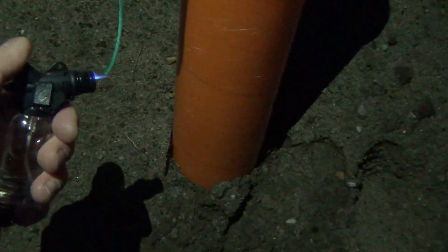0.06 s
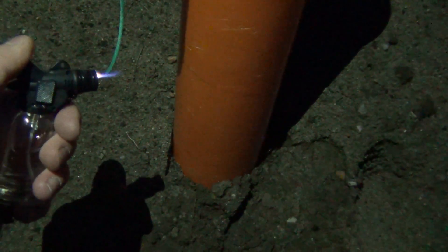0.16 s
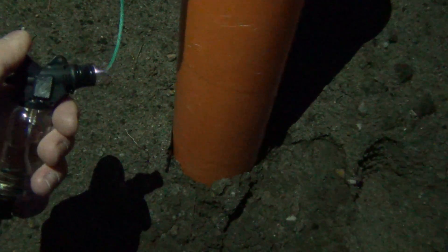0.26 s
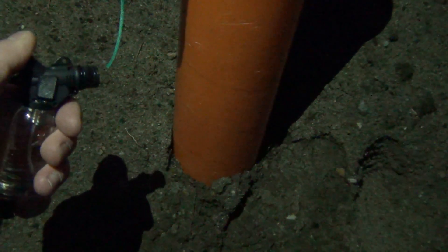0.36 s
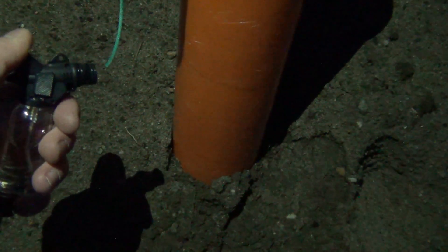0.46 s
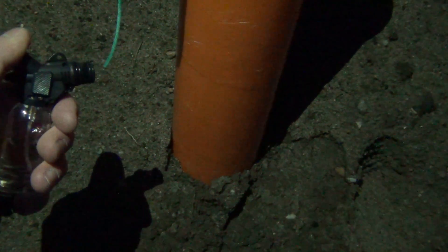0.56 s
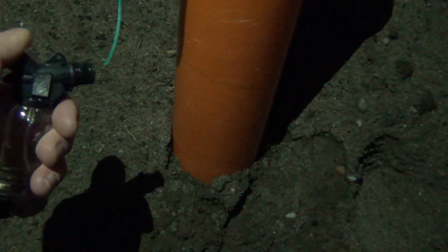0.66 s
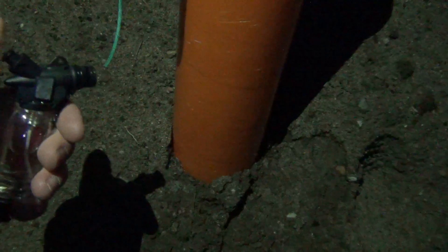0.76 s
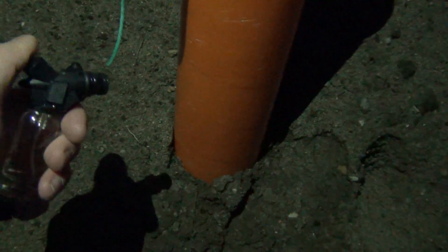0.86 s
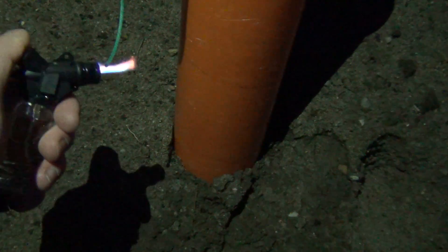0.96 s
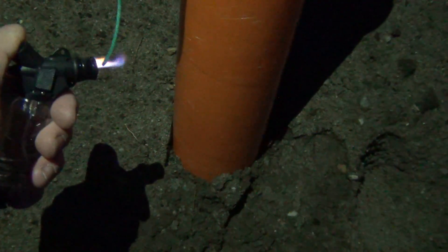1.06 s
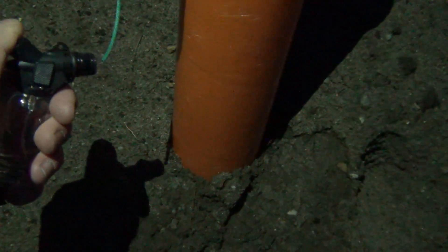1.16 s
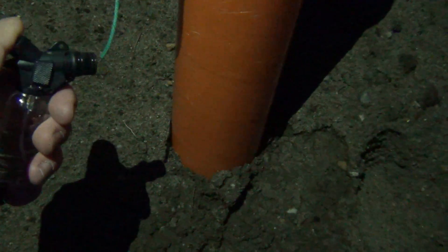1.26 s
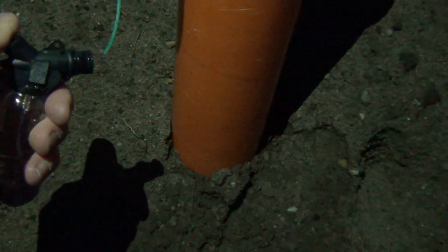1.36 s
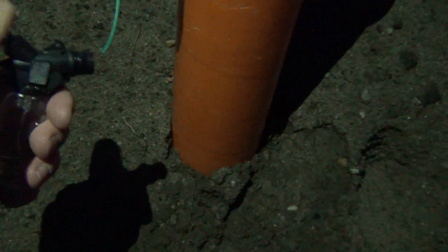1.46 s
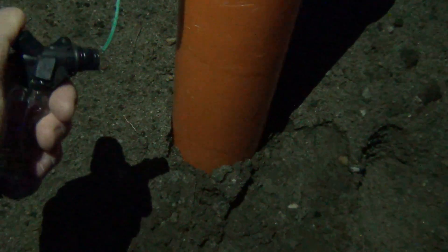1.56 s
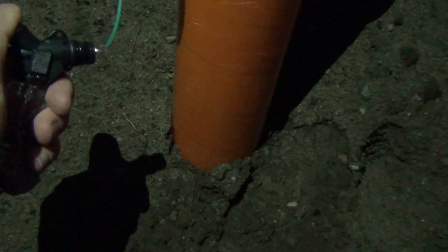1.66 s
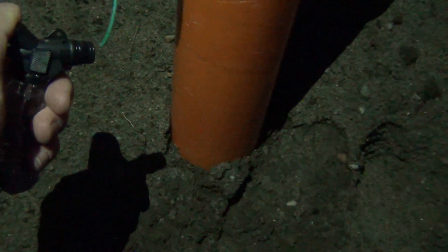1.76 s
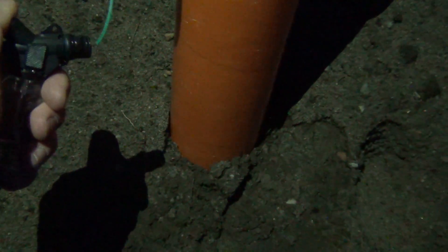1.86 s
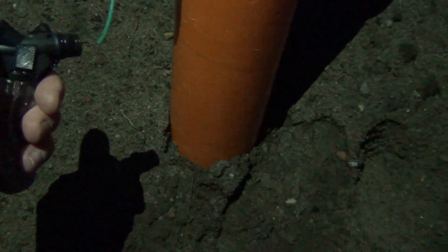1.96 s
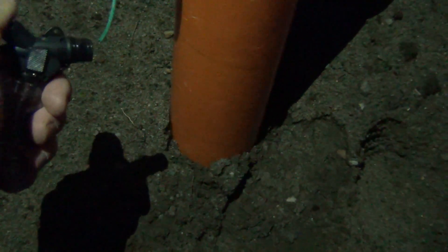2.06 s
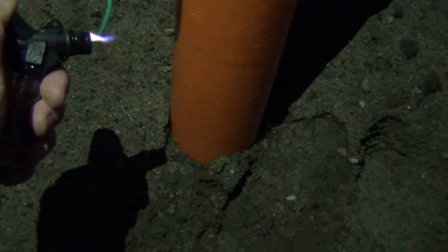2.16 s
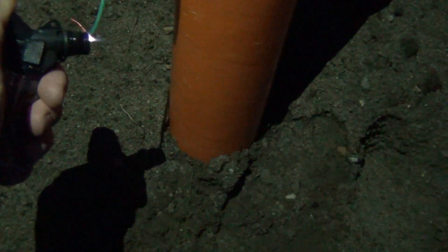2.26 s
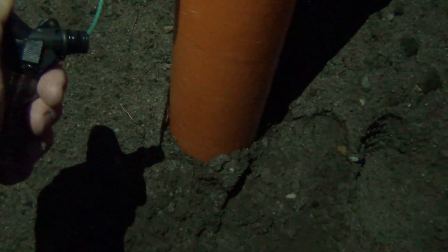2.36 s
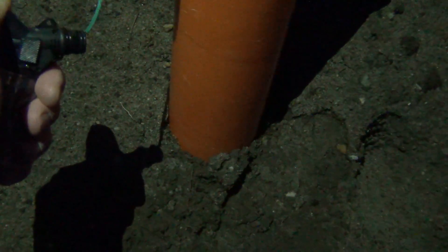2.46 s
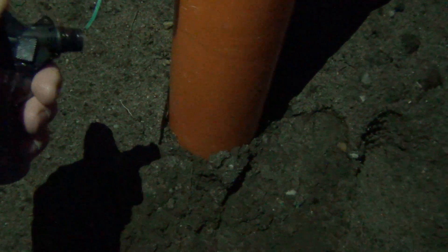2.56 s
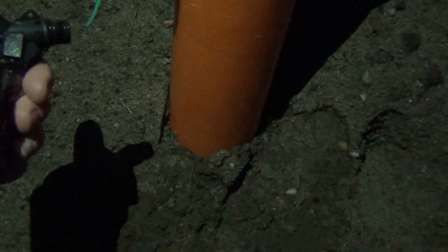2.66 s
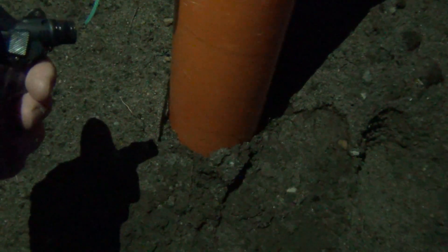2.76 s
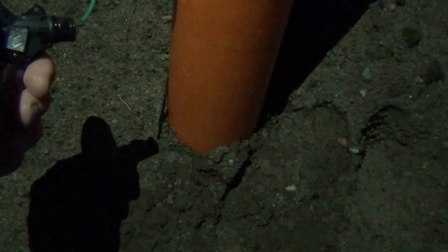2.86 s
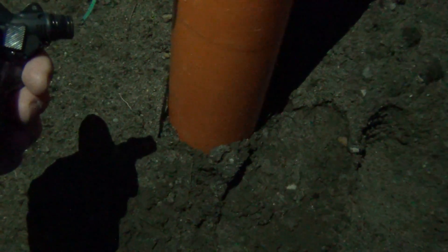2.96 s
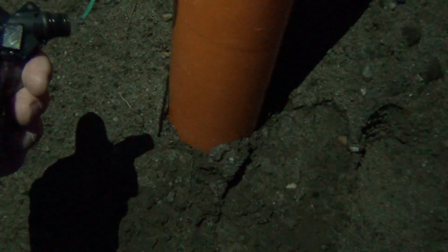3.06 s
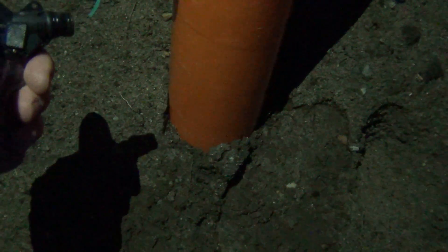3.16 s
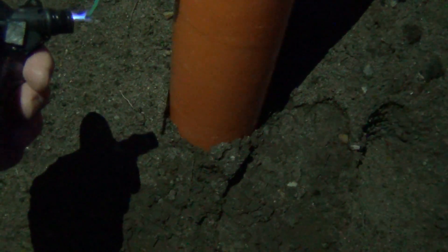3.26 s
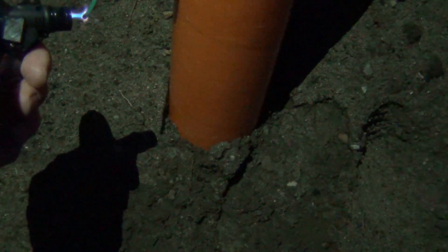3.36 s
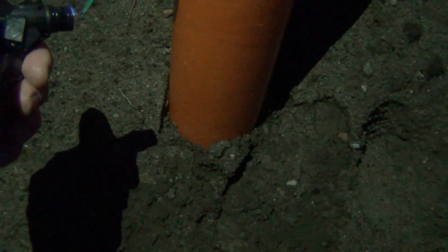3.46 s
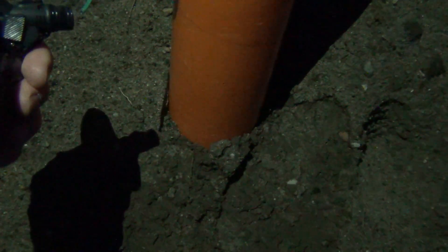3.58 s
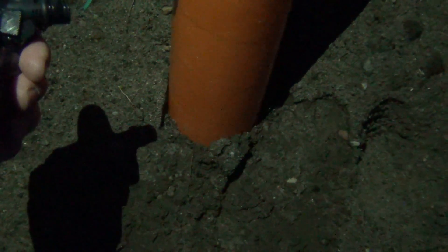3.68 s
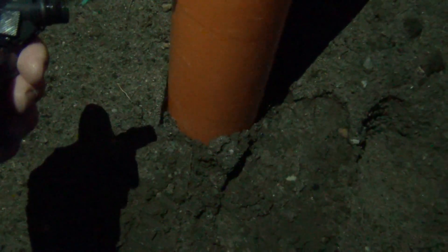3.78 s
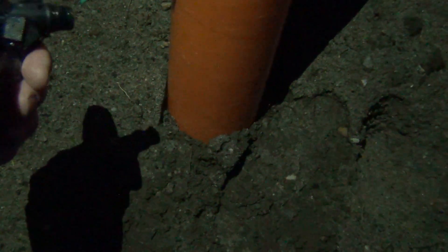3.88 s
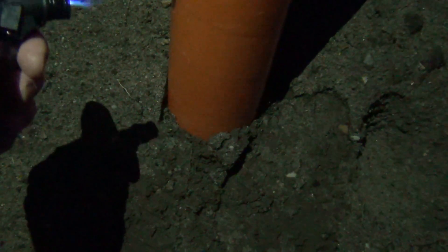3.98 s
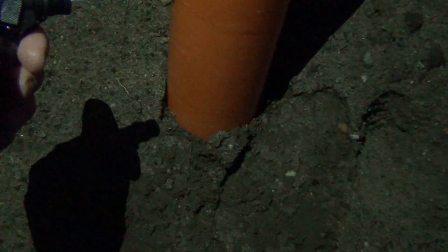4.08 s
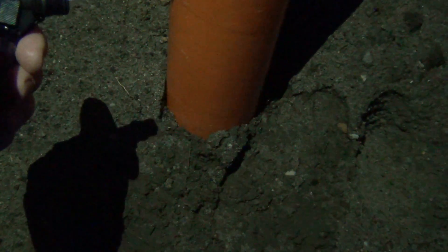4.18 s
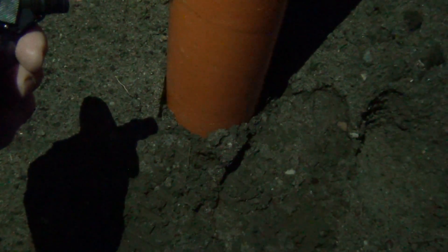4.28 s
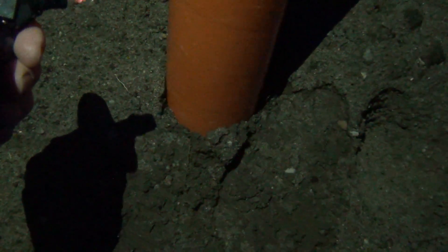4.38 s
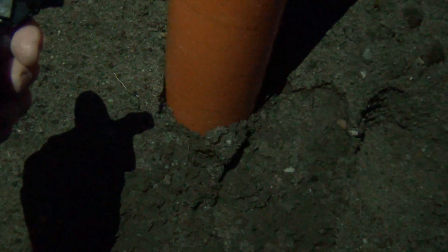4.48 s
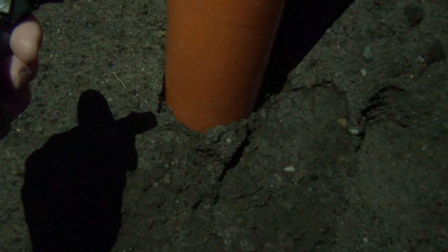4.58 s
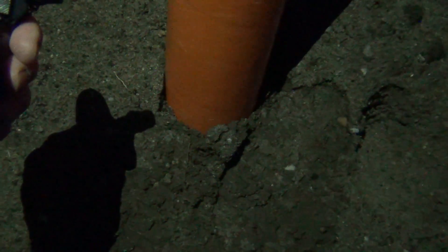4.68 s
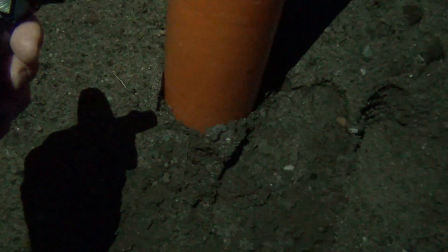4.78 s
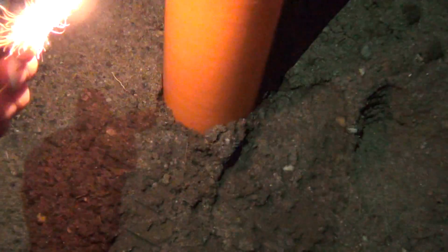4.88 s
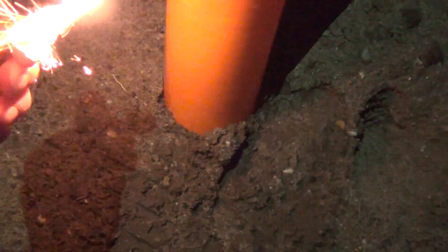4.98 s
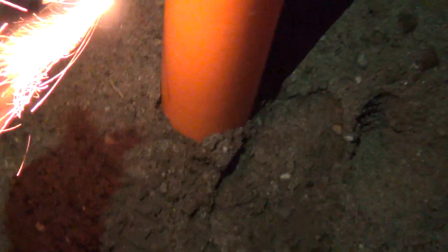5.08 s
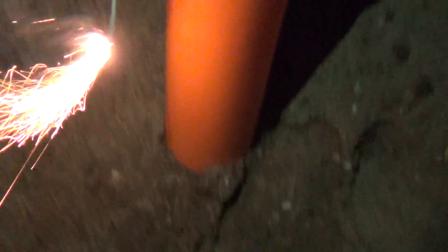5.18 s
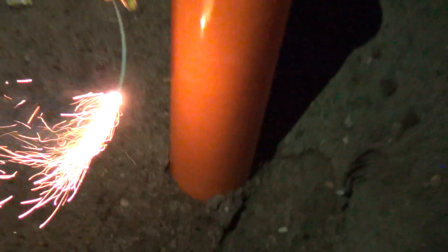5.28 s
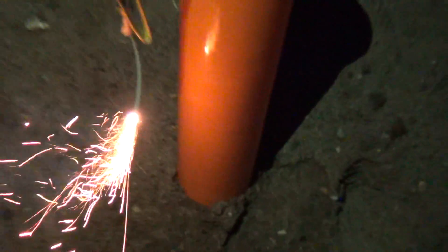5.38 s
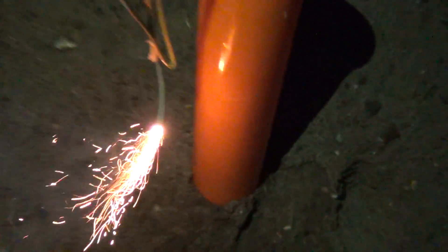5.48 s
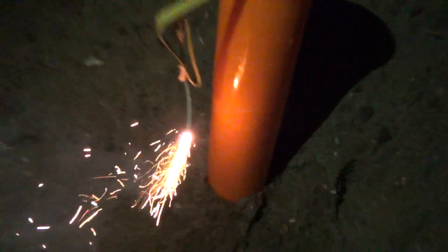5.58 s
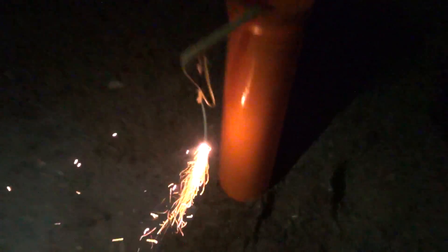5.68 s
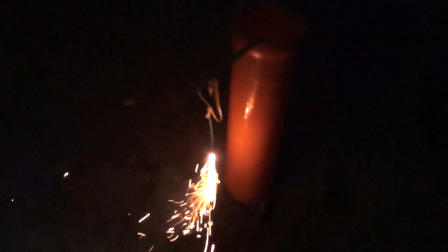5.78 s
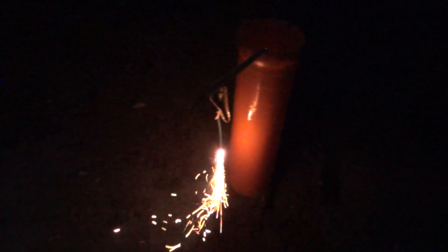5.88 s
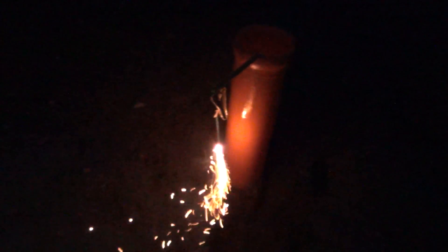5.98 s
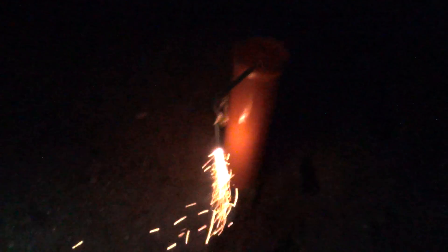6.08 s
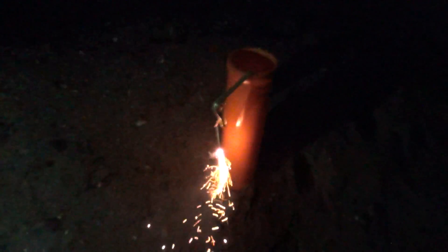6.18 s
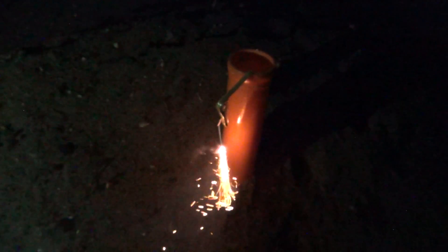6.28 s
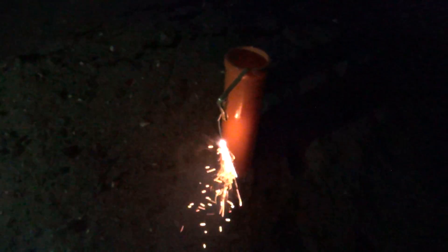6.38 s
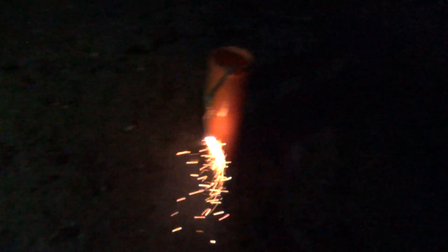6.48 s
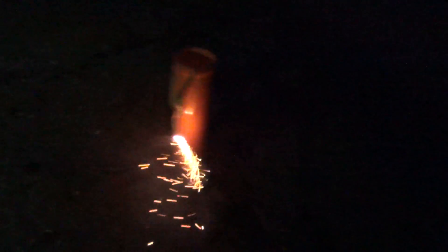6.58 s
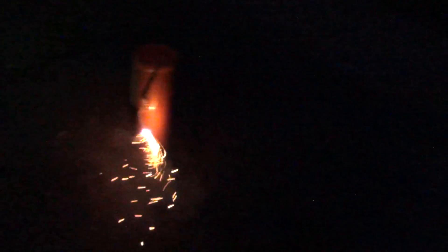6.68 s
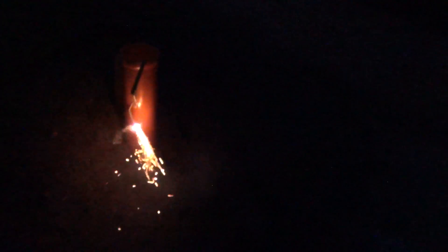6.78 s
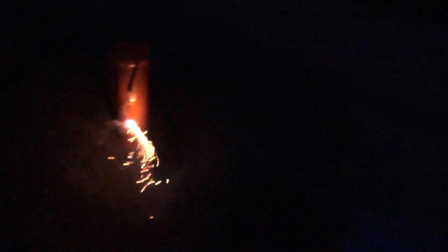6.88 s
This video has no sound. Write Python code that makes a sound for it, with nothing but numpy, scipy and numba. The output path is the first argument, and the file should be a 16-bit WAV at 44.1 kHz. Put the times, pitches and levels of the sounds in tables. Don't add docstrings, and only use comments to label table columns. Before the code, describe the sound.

Sharp plastic igniter snaps and brief sputtering flame bursts over faint gas hiss, then a burning fuse jets out broadly as footsteps crunch back.

```python
import sys
import numpy as np
from scipy import signal
from scipy.fft import rfft, irfft, next_fast_len
from scipy.io import wavfile
from scipy.ndimage import uniform_filter1d, minimum_filter1d, map_coordinates
from numba import njit

SR = 44100
rng = np.random.default_rng(int(sys.argv[2]) if len(sys.argv) > 2 else 0)


def int16_out(signal):
    q = np.round(np.clip(np.atleast_2d(signal).T, -1, 1) * 32767)
    wavfile.write(sys.argv[1], SR, q.astype(np.int16))


def decibels_to_gain(level_db):
    exponent = np.asarray(level_db, float) / 20
    return 10 ** exponent


N = 306054
TIME = np.arange(N) / SR

# (time [s], level [dB])
WIND = [(0, -38), (.25, -36.5), (.7, -39), (.79, -42), (.86, -36), (.92, -43), (1.0, -43.5), (1.08, -39.5),
        (1.2, -45.5), (1.7, -44), (2.55, -47), (2.6, -50.5), (3.4, -54), (3.7, -58.5), (4.9, -56.5),
        (5.06, -53.5), (5.3, -52), (6.1, -39.5), (6.94, -37)]
# (start [s], hold [s], level [dB], rise [dB/ms], fall [dB/ms])
GUSTS = [
    (-.1, .86, -42, 1.5, .06),
    (5.55, 2.5, -44.5, .026, .1),
    (.58, .06, -35, .5, .3),
    (2.9, 1.0, -71, .05, .03),
]
# (frequency [Hz], level [dB per Hz])
BUFFET = [(12, -61), (20, -26), (76, -3), (123, -1), (201, -2), (277, -5.5), (440, -10), (585, -6.5),
          (900, -12), (1170, -34), (1980, -120)]
# (frequency [Hz], level [dB per Hz])
NIGHT = [(88, -45), (150, -27), (400, -18.5), (569, -12), (652, -10.5), (718, -8), (958, -11.5),
         (1280, -10), (1640, -13), (4000, -35.5), (5200, -65), (8800, -120)]
# (frequency [Hz], level [dB per Hz])
NOZZLE = [(2500, -7.5), (3300, -17.5), (4100, -19), (4900, -7.5), (5800, -17), (6500, -4), (6950, -5.5),
          (7400, -0.5), (8400, -11), (10000, -8), (11400, -13.5), (12400, -15), (13600, -17.5),
          (15500, -21.5)]
# (start [s], hold [s])
ALIGHT = [
    (3.29, .31),
    (4.03, .66),
]
# (low edge [Hz], high edge [Hz], change [dB])
ALIGHT_BANDS = [(9000, 11300, -4.5), (11400, 12300, 5), (13100, 14400, 6), (14700, 16000, -4)]
# (time [s], peak [dB], thud [Hz], length [s])
STEPS = [(6.451, -31, 1160, 0.008), (6.604, -23, 222, 0.01), (6.725, -27, 1900, .012),
         (6.77, -15.5, 353, 0.0045), (6.831, -29, 1090, 0.0059), (6.888, -22, 470, 0.012),
         (6.906, -21.5, 910, 0.013), (6.923, -26, 439, 0.01)]
# (time [s], peak [dB], body mode [Hz], middle [dB], treble [dB])
COCKS = [(0.7384, -10.5, 3060, -1, 2), (1.4639, -7.5, 3090, 0, -4), (1.9994, -9, 3050, -1, -3.5),
         (2.6878, -10, 3150, -1.5, -7.5), (3.1176, -5, 2620, 1.5, -2.5), (3.8548, -4.5, 3030, 3.5, -3)]
# (time [s], peak [dB], body mode [Hz], middle [dB], treble [dB])
SNAPS = [(0.9756, 2.5, 3320, 4, 3.5), (1.6203, 1.5, 3190, 3.5, 0.5), (2.1662, 0.2, 3120, 1.2, 0),
         (2.847, 7, 3156, -1.5, -3.5), (3.2745, 3.5, 3130, 1, 0), (4.0082, 2.5, 3095, 2, 0.5)]
# (time [s], peak [dB], body mode [Hz], middle [dB], treble [dB])
TICKS = [(0.6774, -27, 2430, 0, 8), (0.8428, -21, 2390, 0, 0), (1.4194, -31, 2460, -1, 0.5),
         (1.51, -20.5, 3390, -8, 0), (1.95, -29, 2550, 1, -6), (2.0587, -23, 3300, -6, -13),
         (2.7207, -26, 3240, -8, -7), (2.7472, -21, 3150, -1, -2), (3.071, -30.5, 2360, -4, -6),
         (3.1562, -19.5, 3320, -4, -4), (3.8094, -29.5, 3160, -7, -4), (3.906, -22.5, 3280, -4, -3)]
# (frequency [Hz], level [dB], 60 dB decay [s])
SHELL = [(2150, -5, 0.0086), (2600, -5, 0.0075), (3450, -7, .007), (3840, -15, 0.015), (5200, -7, 0.0053),
         (5170, -14, 0.0092), (6110, -12, 0.015), (7000, -3.5, 0.0048), (7060, 0, 0.0073),
         (7780, 3.5, 0.0055), (8220, -11, 0.0079), (9070, -8, 0.0094), (11960, -23, .008)]
# (frequency [Hz], level [dB], 60 dB decay [s])
STRUCK = [(2550, -15, 0.014), (3975, -4, 0.0074), (4340, -7, 0.0069), (5090, -4, 0.0083),
          (5560, -9, 0.0085), (6400, -7, 0.011), (7300, -2, 0.011), (7750, -3.5, 0.011),
          (8240, -19.5, 0.011), (9700, -17, 0.0098), (11500, -21, 0.0066)]
# (start [s], hold [s], roar [dB], crackle over roar [dB], fall [dB/ms])
FLARES = [(-.02, 0.38, -41, -21, 4), (0.266, .025, -36.5, -12, 1), (0.986, .13, -29, -6, 0.8),
          (1.1, .04, -39, -10, .6), (1.627, 0.041, -34.5, -5, 1.5), (1.66, 0.07, -42, -16, 0.5),
          (2.17, .065, -38, -20, .9), (2.241, 0.088, -42.5, -10, 1), (2.62, .035, -47.5, -5, .5),
          (3.172, .018, -41.5, 0.5, 1), (3.298, .11, -35.5, -2, .5), (3.416, 0.065, -37.5, -10.5, .18),
          (3.531, .06, -43, -10, 0.5), (3.928, .022, -43, -3, 2), (4.028, .025, -36, -6, .5),
          (4.03, .74, -40.5, -9, 2), (4.325, .05, -38, -6, .1), (4.363, .065, -35, -1.5, .3),
          (4.742, 0.03, -27.5, -10.5, 3), (4.89, .25, -23, -3.5, 4), (5.131, 0.11, -30.5, 0, 2),
          (5.25, 0.088, -45, -7, .5)]
# (time [s], bass change [dB])
FLAME_SIZE = [(.2, 0.5), (1.05, 2.2), (1.65, 3), (2.2, 1.5), (3.35, -2.5), (4.2, -.5), (4.4, -.5),
              (4.76, 1.5), (4.95, -4.5), (5.2, -3.5)]
# (frequency [Hz], level [dB per Hz])
ROAR = [(88, -37), (150, -22.5), (285, -15.5), (420, -14.5), (631, -3.5), (1000, -4), (1540, -7.5),
        (1870, -3.5), (2360, -5.5), (3000, -7), (4480, -16.5), (7860, -30.5), (15500, -34)]
# (time [s], peak [dB], length [s], treble [dB])
PUFFS = [(0.296, -18.5, 0.0054, 6), (1.017, -19, 0.0052, 4), (1.045, -14, 0.0074, 2),
         (1.068, -22, 0.0046, -2), (1.097, -27, 0.006, 0), (1.105, -18, 0.0062, -2),
         (2.175, -19, 0.0054, -4), (2.216, -27, 0.013, -3), (2.261, -17.5, 0.007, 6),
         (2.297, -20, 0.011, 8.5), (2.324, -16.5, 0.0039, 8.5), (3.408, -29, 0.0045, -2),
         (3.475, -27.5, 0.0052, -9.5), (3.603, -32.5, 0.0072, 15.5), (4.3346, -18, 0.003, 7),
         (4.382, -22, 0.0054, 8), (4.405, -20, 0.0084, 7), (4.4247, -25, 0.0079, 15),
         (4.478, -25, 0.006, 11.5), (4.559, -22, 0.009, 10), (4.633, -27.5, 0.0037, -3),
         (4.739, -29, 0.006, 16), (4.756, -16.5, 0.004, -2), (4.775, -31, 0.0063, 16),
         (4.801, -28, 0.0064, 7)]
# (time [s], level [dB])
FUSE = [
    (4.87, -64),
    (4.88, -37),
    (4.9, -24.5),
    (4.96, -19.5),
    (5.02, -19),
    (5.43, -20.5),
    (5.75, -20.6),
    (6.25, -21),
    (6.94, -24.3),
]
# (frequency [Hz], level [dB per Hz])
BURN = [(180, -45), (300, -25), (431, -20), (526, -17), (1090, -14.5), (1590, -12.5), (2070, -12.5),
        (2400, -12), (2980, -6.5), (3340, -8.5), (4100, -7.5), (5480, -7.5), (6300, -7.5), (7880, -3.5),
        (11000, -16), (15500, -28.5)]
FUSE_EDGES_HZ = [4400, 6800, 10500]
# (time [s], length [s], change [dB])
CHOKES = [
    (5.74, 0.013, -5.5),
    (5.54, .15, 1),
    (6.31, .04, -1.5),
    (6.56, 0.051, -0.5),
    (6.78, 0.076, 1.5),
    (6.15, .1, 1.1),
    (6.39, .03, 2),
]
# (time [s], share of the ports' difference)
BEARING = [(4.9, 1.2), (5.25, 0.85), (5.7, 0.33), (6.5, 0.32), (6.65, 0.52), (6.94, .85)]
# (time [s], delay [ms], bass share, treble share)
GROUND = [(0, 1.1, .34, .15), (.4, 1.09, .34, .15), (1.05, 1.028, .4, .2), (3.3, 1.072, .4, .2),
          (4.9, 1.058, .42, .15), (5.08, 1.03, .4, .2), (5.3, 1.025, .33, .15), (5.6, 1.022, .33, .06),
          (5.88, 1.012, .33, .1), (6.0, .988, .3, .22), (6.3, .962, .32, .25), (6.55, .928, .25, .25),
          (6.94, .87, .22, .33)]
# (time [s], delay [ms], share)
WALL = [(4.85, .43, 0), (4.92, .42, .2), (5.08, .36, .15), (5.3, .32, .2), (5.46, .29, .16),
        (5.64, .28, .08), (5.8, .272, .2), (6.2, .27, .2), (6.35, .27, .08), (6.52, .275, .15),
        (6.66, .32, .17), (6.94, .33, .05)]
# (frequency [Hz], left minus right [dB])
PORTS = [(200, -8), (380, -0.5), (700, 0), (1300, 1.5), (2400, 1.5), (4400, 4), (8100, 3), (15000, 2.5)]


def curve(table):
    s, *columns = np.transpose(table)
    return [np.interp(TIME, s, column) for column in columns]


def between(pair, share):
    return pair[0] + (pair[1] - pair[0]) * share


def unit(x):
    return x / np.sqrt(np.mean(x ** 2))


def add(out, s, x):
    i = int(s * SR)
    out[i:i + len(x)] += x[:N - i]


def pan(x, db):
    return x * decibels_to_gain(np.array([1, -1])[:, None] * db / 2)


def late(x, ms):
    return np.array([map_coordinates(ear, [np.arange(N) - ms * SR / 1000], order=3) for ear in x])


def swell(start, hold, db, rise_db_ms, fall_db_ms):
    ms = (TIME - start) * 1000
    rise = rise_db_ms * ms - 20.5
    fall = fall_db_ms * (hold * 1000 - ms)
    return decibels_to_gain(db + np.minimum(0, np.minimum(rise, fall)))


def noise(apart_db):
    mid, side = rng.standard_normal((2, N))
    return mid + decibels_to_gain(apart_db) * side * np.array([[1], [-1]])


def walk(rate):
    k = int(SR / rate)
    levels = np.repeat(rng.standard_normal(N // k + 1), k)
    return 0.97 * uniform_filter1d(uniform_filter1d(levels, k), k)[:N]


def band(x, lo_hz, hi_hz):
    return signal.sosfilt(signal.butter(3, [lo_hz, hi_hz], "band", fs=SR, output="sos"), x)


def low(x, hz, order=4):
    size = next_fast_len(N)
    ratio = np.arange(size // 2 + 1) * SR / size / hz
    return irfft(rfft(x, size) / (1 + ratio ** (2 * order)), size)[..., :N]


def colour(x, points, size=2048):
    hz, db = np.transpose(points)
    log_hz = np.log(np.arange(size // 2 + 1) * SR / size + 1)
    cep = irfft(np.interp(log_hz, np.log(hz), db) * np.log(10) / 20)
    cep[1:size // 2] *= 2
    cep[size // 2 + 1:] = 0
    response = irfft(np.exp(rfft(cep)))
    return signal.fftconvolve(np.atleast_2d(x), response[None], axes=1)[:, :np.shape(x)[-1]]


@njit
def resonate(x, hz, width):
    y, b, l = np.empty(len(x)), 0., 0.
    for i in range(len(x)):
        g, k = np.tan(np.pi * hz[i] / SR), width / hz[i]
        v = (b + g * (x[i] - l)) / (1 + g * (g + k))
        b, l, y[i] = 2 * v - b, l + 2 * g * v, k * v
    return y


@njit
def limiter(peak, top, release):
    gain, e = np.empty(len(peak)), 0.
    for i in range(len(peak)):
        e = max(peak[i], e * release)
        gain[i] = min(1., top / (e + 1e-9))
    return gain


def wind():
    calm_db, deep_db, wind_pan_db, deep_pan_db = -68, -17.5, -6.5, -6.5
    db, = curve(WIND)
    gain = decibels_to_gain(db)
    deep_gain = gain * decibels_to_gain(deep_db) + sum(swell(*gust) for gust in GUSTS)
    eddies = colour(noise(-18), BUFFET)
    flutter = unit(band(eddies, 110, 1600)) * gain * decibels_to_gain(1.8 * walk(22))
    thump = pan(unit(band(eddies, 33, 114)), deep_pan_db) * deep_gain * decibels_to_gain(1.8 * walk(14))
    return pan(flutter + thump, wind_pan_db * np.clip((db - calm_db) / 22, 0, 1))


def night():
    return unit(colour(noise(-18.5), NIGHT)) * decibels_to_gain(-46.5 + 1.2 * walk(2.74))


def gas():
    jet = colour(noise(-20), [(1200, -27)] + NOZZLE)
    hand_ms = between((0.464, 0.494), np.clip(TIME / 4.2, 0, 1) ** 2)
    jet = jet - 0.45 * late(jet - low(jet, 8500), hand_ms)
    jet = unit(jet) * decibels_to_gain(-44.5 + 0.71 * walk(17))
    lit = swell(4.04, 0.64, 0, .2, .2)
    jet = jet - (1 - decibels_to_gain(-2.5)) * lit * low(jet, 12000)
    alight = sum(swell(s, hold, 0, 1, 1) for s, hold in ALIGHT)
    change = 0
    for lo, hi, db in ALIGHT_BANDS:
        change = change + (decibels_to_gain(db) - 1) * (low(jet, hi, order=8) - low(jet, lo, order=8))
    return jet + alight * change


def steps():
    out, t = np.zeros(N), np.arange(2048) / SR
    for s, db, hz, length in STEPS:
        grit = band(rng.standard_normal(len(t)), 600, 2140)
        thud = np.sin(2 * np.pi * hz * t)
        blow = t / length
        add(out, s, decibels_to_gain(db) * blow * np.exp(1 - 2 * blow) * (thud + 3.1 * grit))
    return out


def ring(hz, db, t60):
    t = np.arange(2048) / SR
    return decibels_to_gain(db) * np.sin(2 * np.pi * hz * t) * decibels_to_gain(-60 * t / t60)


def igniter(events, shell, scatter, body_db, body_t60, contacts, spring_db=-90):
    out, lead = np.zeros(N), 0.005
    onset = 1 - np.exp(-np.arange(2048) / SR / .0002)
    for s, db, body_hz, middle_db, treble_db in events:
        chance = scatter * rng.standard_normal((len(contacts), len(shell) + 2))
        sound = np.zeros(4096)
        for (lag, hit_db), c in zip(contacts, chance):
            tone = ring(body_hz, body_db, body_t60)
            tone = tone + ring(14300, -23, .004)
            tone = tone + ring(3240, spring_db, .1)
            for (f, mode_db, t60), u in zip(shell, c):
                tilt_db = treble_db if f > 6100 else middle_db if f > 3600 else 0
                tone = tone + ring(f * (1 + 0.043 * u), mode_db + 2.3 * u + tilt_db, t60)
            add(sound, lead + lag + .0002 * c[-1], decibels_to_gain(hit_db + 2 * c[-2]) * tone * onset)
        sound = band(sound, 1660, 17300)
        add(out, s - lead, decibels_to_gain(db) * sound / np.abs(sound).max())
    return out


def cocks():
    scrape = [(-.003, -19), (-.0005, -14), (.0006, 2.5), (.002, -1.5), (.0034, -9), (.007, -22), (.012, -20)]
    return igniter(COCKS, SHELL, .8, -4, 0.0094, scrape, spring_db=-30)


def snaps():
    bounces = [(.0008, -1.5), (.0027, -19), (.0055, -27), (.0072, -20.5)]
    return decibels_to_gain(1.5) * igniter(SNAPS, STRUCK, 0.53, 0, 0.0089, bounces)


def ticks():
    return igniter(TICKS, SHELL, 0.92, 1, 0.0083, [(.0006, -1), (.002, -7)])


def sputters():
    flow, fizz = np.zeros((2, N))
    for s, db, length, treble_db in PUFFS:
        t = np.arange(2048) / SR / length
        burst = t * np.exp(1 - t ** 2)
        add(flow, s, decibels_to_gain(db - 19.5 - treble_db) * burst)
        add(fizz, s, decibels_to_gain(db - 23.5 + treble_db) * burst)
    return flow, fizz


def flame():
    chance = rng.random((2, N))
    pop_now = chance[0] < 1800 / SR
    pops = pop_now * decibels_to_gain(np.minimum(-3.5 * np.log(chance[1] + 1e-9), 9))
    roar = colour(noise(-18) + 0.84 * unit(pops - pops.mean()), ROAR)
    roar = unit(roar) * decibels_to_gain(1.2 * walk(70))
    bass_db, = curve(FLAME_SIZE)
    roar = roar + (decibels_to_gain(bass_db) - 1) * low(roar, 1350)
    crackle = unit(band(pops, 2800, 5350) + band(pops, 6200, 7950)) * decibels_to_gain(2.8 * walk(90))
    roaring = [swell(s, hold, db, 1.34, fall) for s, hold, db, _, fall in FLARES]
    crackling = [gain * decibels_to_gain(flare[3]) for gain, flare in zip(roaring, FLARES)]
    flow, fizz = sputters()
    hiss = noise(-22)
    jet = unit(colour(hiss, [(1200, -38)] + NOZZLE))
    hiss = unit(unit(band(hiss, 3500, 10700)) + 2.1 * jet) * decibels_to_gain(2.4 * walk(300))
    return roar * (np.max(roaring, axis=0) + flow) + crackle * np.max(crackling, axis=0) + hiss * fizz


def fuse():
    start, catch = FUSE[0][0], FUSE[2][0]
    settled = 1 - np.exp(-np.maximum(TIME - start, 0) / 0.43)
    roar_db, spit_db, sizzle_db = (between(p, settled) for p in ((-2.5, -6.6), (-2.5, -18), (-8, -9.8)))
    jet_hz = between((7300, 7950), settled)
    choke_db = sum(db * np.exp(-((TIME - s) / length) ** 2) for s, length, db in CHOKES)
    bearing, = curve(BEARING)
    shade_db = -6.5 * bearing
    burn = colour(noise(-26), BURN)
    a, b, c = (low(burn, hz) for hz in FUSE_EDGES_HZ)
    hiss = c - b + 0.43 * np.array([resonate(ear, jet_hz, 1200.0) for ear in c - b])
    out = unit(hiss) * decibels_to_gain(choke_db + 0.91 * walk(40))
    out += unit(a) * decibels_to_gain(roar_db + .3 * choke_db + 1.3 * walk(40))
    out += unit(b - a) * decibels_to_gain(spit_db + 1.4 * walk(30))
    out += unit(burn - c) * decibels_to_gain(sizzle_db + shade_db + 0.84 * choke_db + 0.75 * walk(40))
    fizz_db = 6 * np.exp(-((TIME - catch) / .2) ** 4)
    out += (decibels_to_gain(fizz_db) - 1) * (out - low(out, 12200))
    effort_db, = curve(FUSE)
    return out * decibels_to_gain(effort_db + 0.66 * walk(25)) * (TIME > start)


def ground(x):
    ms, bass, treble = curve(GROUND)
    wall_ms, wall = curve(WALL)
    dull = low(x, 6500, order=1)
    floor = late(dull, ms) * bass + late(x - dull, ms) * treble
    return x + pan(floor, -1.5) + pan(wall * late(x, wall_ms), -2.5)


def ports(x):
    hz, db = np.transpose(PORTS)
    size = next_fast_len(N)
    log_hz = np.log(np.arange(size // 2 + 1) * SR / size + 1)
    tilt_db = np.interp(log_hz, np.log(hz), db)
    return irfft(rfft(x, size) * decibels_to_gain(np.array([tilt_db, -tilt_db]) / 2), size)[:, :N]


def scene():
    murmur = pan(night() + gas(), -1.7)
    clicks = cocks() + snaps() + ticks()
    burning = ground(pan(flame(), -0.15) + fuse())
    near = band(burning + clicks + murmur + steps(), 175, 21700)
    bearing, = curve(BEARING)
    return bearing * ports(near) + (1 - bearing) * near + wind()


def low_pass(x):
    return signal.sosfilt(signal.butter(12, 16520, fs=SR, output="sos"), x)


def record(dry):
    peak = -minimum_filter1d(-np.abs(dry).max(axis=0), size=133)
    gain = limiter(peak, 0.58, np.exp(-1 / (0.02 * SR)))
    gain = uniform_filter1d(gain, size=89)
    top_cut = signal.ellip(10, .2, 50, 15730, fs=SR, output="sos")
    mix = signal.sosfilt(top_cut, dry * gain)
    return low_pass(mix)


dry = scene()
out = record(dry)
int16_out(out)
```